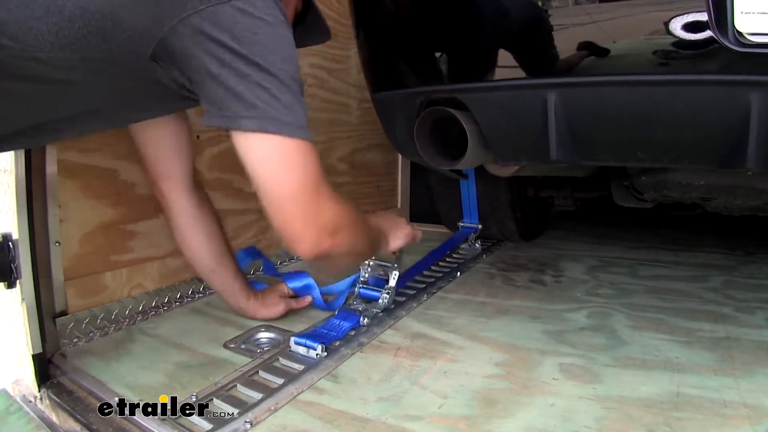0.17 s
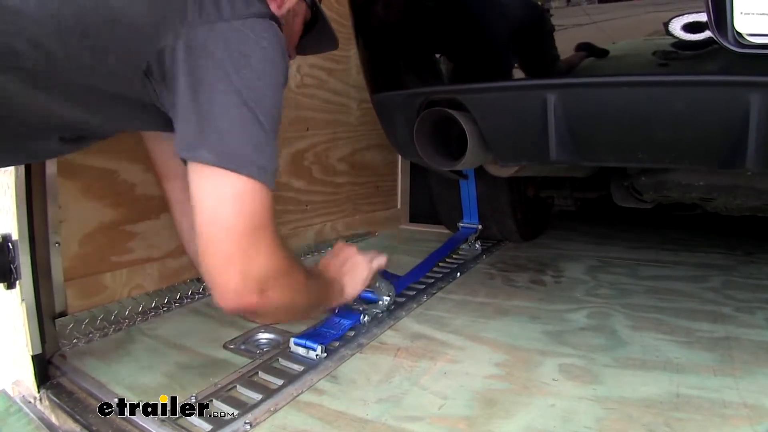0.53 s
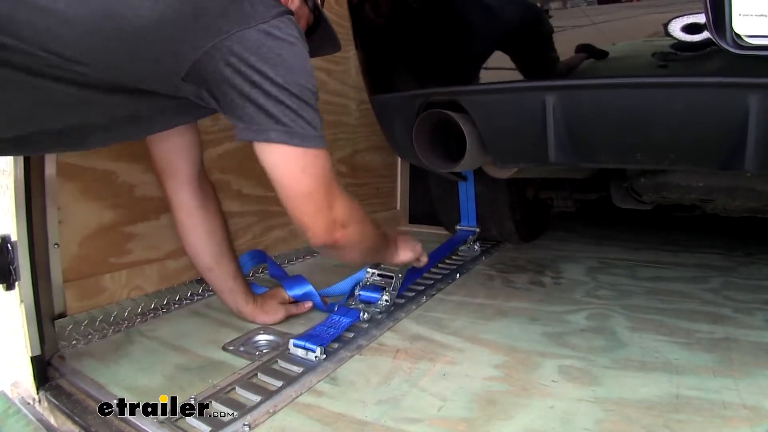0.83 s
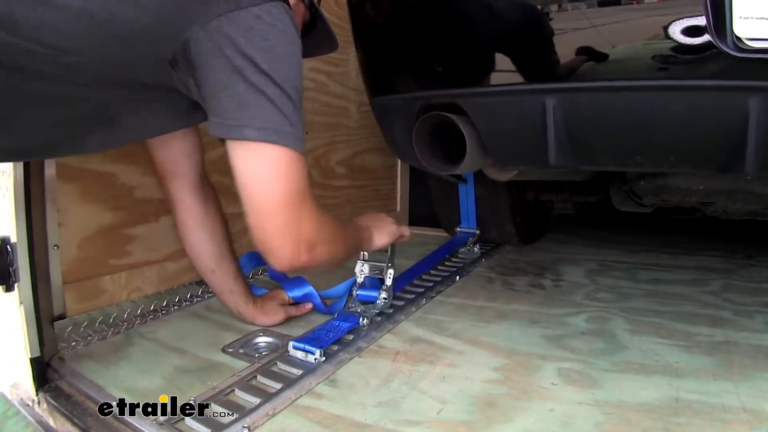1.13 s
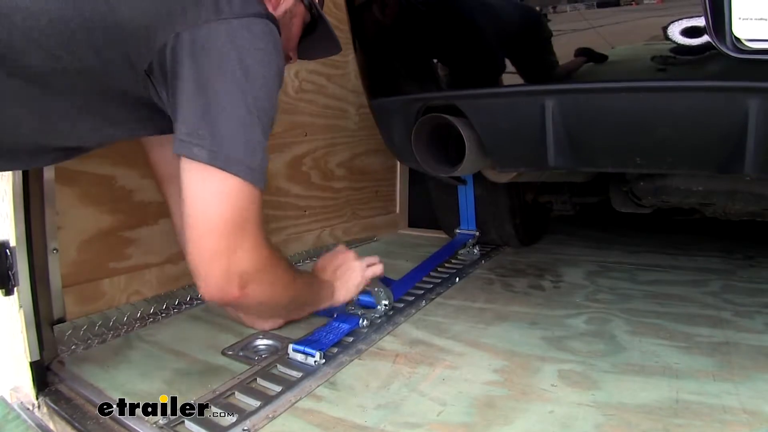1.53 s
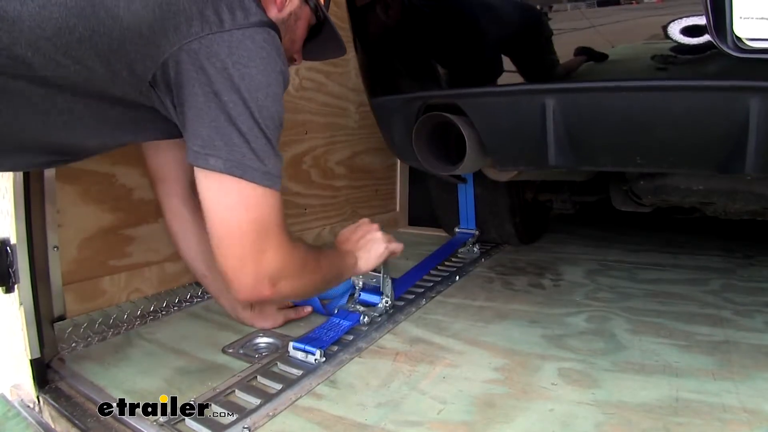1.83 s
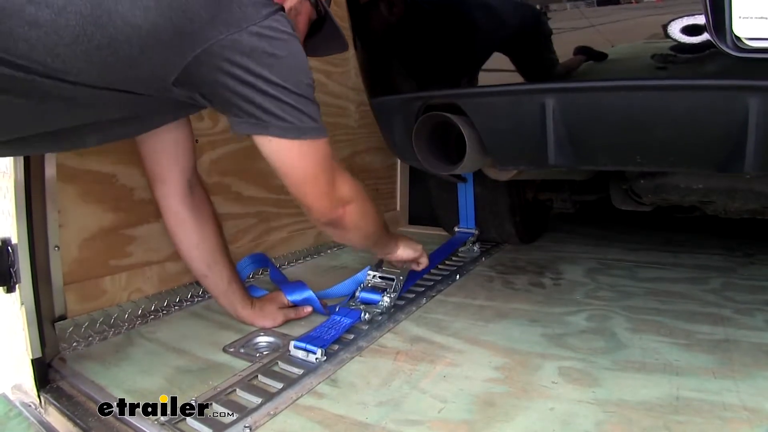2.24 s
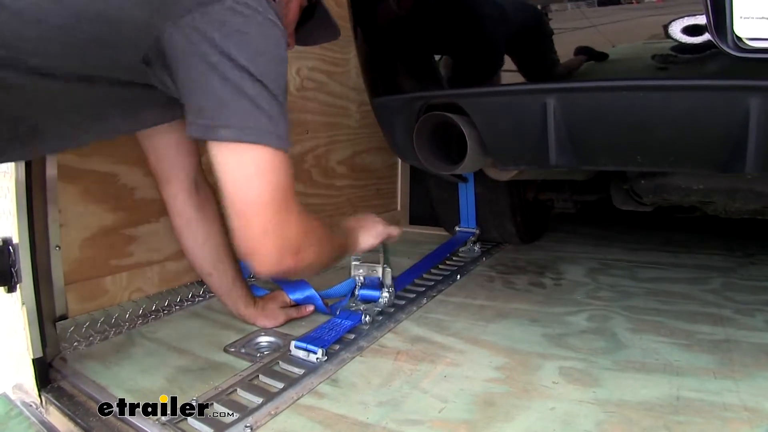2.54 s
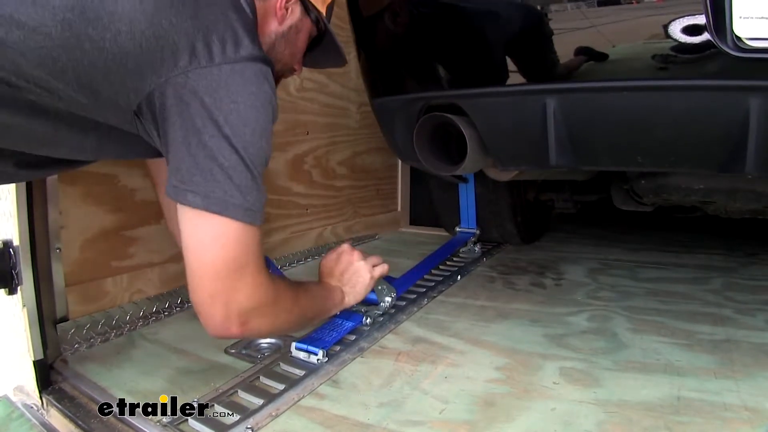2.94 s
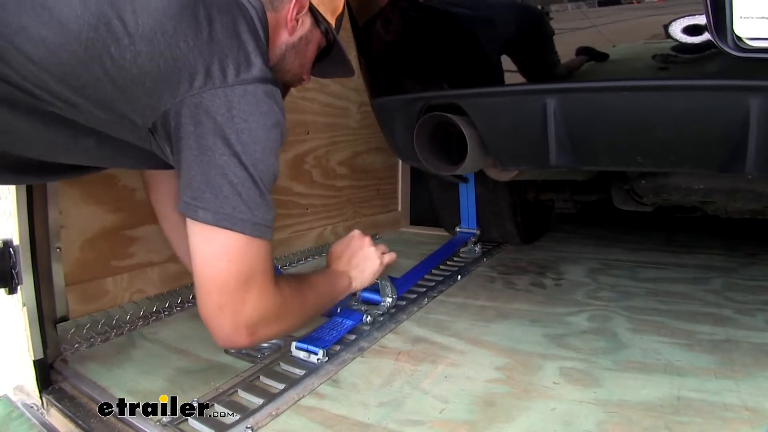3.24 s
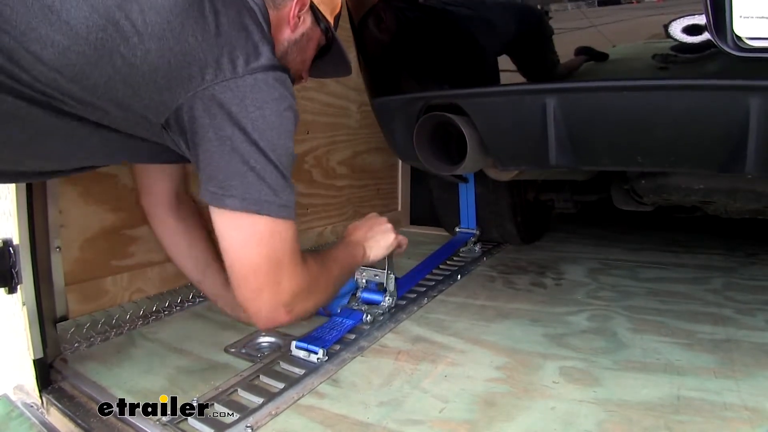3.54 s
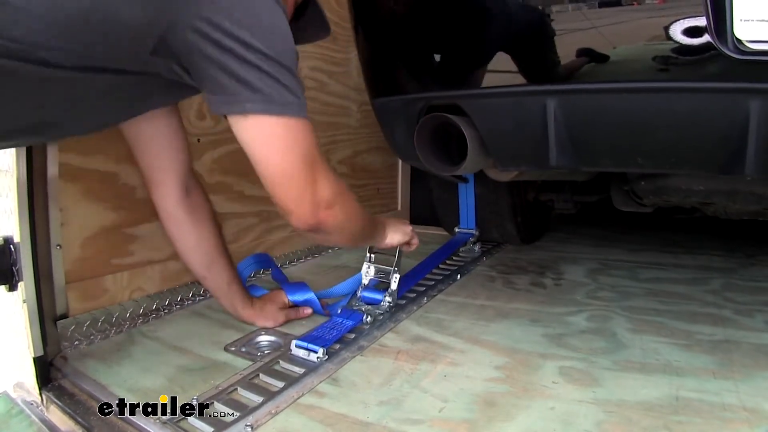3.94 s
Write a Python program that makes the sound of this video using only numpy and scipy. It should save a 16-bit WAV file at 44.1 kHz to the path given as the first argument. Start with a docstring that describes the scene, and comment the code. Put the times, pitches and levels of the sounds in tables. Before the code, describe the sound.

Someone tightens a strap with a steel ratchet. Irregular strokes bring hard, bright clicks, some thin and ringing, some heavier and clunky, as the buckle knocks the metal track and the hollow floor answers. Strap fabric rustles, loose parts tick. A lull comes around three seconds, then more knocks and loud clicks. Close, nearly mono sound, short boxy echoes, soft outdoor rumble behind.

```python
"""Ratchet buckle in a cargo trailer

A ratchet buckle is cranked to tighten a strap inside a plywood trailer, close to the microphone.
Pawls snap over teeth (noise cracks plus damped modes); the buckle knocks the steel floor track and
the floor booms under it. Shaped noise makes the handle scrapes, the rustling webbing and the rumble;
loose parts tick, sines hum and whistle. Decaying noise echoes the box; a limiter holds the peaks."""
import sys
import numpy as np
from scipy import signal
from scipy.fft import rfft, irfft, next_fast_len
from scipy.io import wavfile
from scipy.ndimage import uniform_filter1d, minimum_filter1d, map_coordinates

SR = 44100
rng = np.random.default_rng(int(sys.argv[2]) if len(sys.argv) > 2 else 0)


def dump_mix(stems):
    """Bounce the given channels to the path in sys.argv[1] as a 16-bit WAV at rate SR."""
    frames = np.atleast_2d(stems).T  # one column per channel
    limited = np.clip(frames, -1, 1)  # hard clip at full scale
    pcm = np.round(limited * 32767).astype(np.int16)
    wavfile.write(sys.argv[1], SR, pcm)


N = 180881
RING_TIME = np.arange(SR // 2) / SR  # seconds

# Runs of evenly spaced steel contacts in the buckle. Each row: start in seconds, number of contacts,
# spacing in seconds, relative level of the first in dB, level change per contact in dB,
# load of the first contact (0 = pawl skipping freely, 1 = pressed against the frame).
CONTACT_RUNS = [(0.139, 2, 0.024, -14, -11, 0.75), (0.273, 2, 0.0059, -12.5, 9.5, 0),
                (0.328, 2, .0178, -21.5, 15, 0.23), (0.429, 1, 0.0099, -4.5, 0, 0.14),
                (0.5617, 2, 0.027, -9, -17, 0.94), (0.667, 3, 0.0081, -20, 6, 0.31),
                (0.762, 3, 0.0075, -12.5, 3, 0.31), (0.8729, 3, 0.012, -7.5, -4.5, 0.59),
                (1.041, 1, 0, -31.5, 10, 0.18), (1.0786, 3, 0.021, -22.5, 0.5, 0.98),
                (1.22, 2, .007, -6.5, 3, .05), (1.3284, 1, 0, -3, 0, 0), (1.4133, 1, 0, -3, 0, 0.1),
                (1.5434, 3, 0.022, -32.5, 7.5, 0.5), (1.8983, 4, .012, -7.5, 0.03, 0.85),
                (2.0454, 3, 0.013, -8, 1.6, 0.69), (2.213, 4, 0.011, -5, -3, 0.85),
                (2.394, 1, 0, -25.5, 0, 0.98), (2.557, 2, .006, -6.5, 3, 0.18),
                (2.6314, 2, 0.011, -10.5, 8, .15), (2.7106, 2, 0.012, -7, -5.5, 0.066),
                (2.8767, 2, 0.018, -29.5, 7.5, 0.88), (3.199, 2, 0.004, -26, 6, .95),
                (3.525, 1, 0, -3.5, 3, 0.61), (3.552, 4, .0105, -9.5, 0.2, 0.71),
                (3.8098, 1, 0.017, -5, -3, 0.83), (3.832, 2, 0.0088, -13, 6.5, 0.88),
                (3.962, 2, 0.011, -33, 19, 0.53)]
# Contact noise under load. Each row: frequency in Hz, relative density in dB per Hz.
LOADED_CRACK_SPECTRUM = [(300, 2.5), (1000, 0), (2000, 4), (3300, 1.5), (4400, 11), (6000, 0), (8500, 4.5),
                         (12000, -16.5), (16000, -11)]


def amp(db):
    """Decibels to gain."""
    return 10 ** (np.asarray(db) / 20)


def unit(x):
    """Scale to rms 1."""
    return x / np.sqrt(np.mean(x ** 2) + 1e-20)


def along(points, hz):
    """Read (Hz, value) points on a log frequency axis."""
    point_hz, values = np.transpose(points)
    return np.interp(np.log(hz + 1), np.log(point_hz + 1), values)


def filtered(x, response):
    """Apply a zero-phase response, given as a function of frequency in Hz."""
    size = next_fast_len(len(x) + 4096)
    spectrum = rfft(x, size) * response(np.fft.rfftfreq(size, 1 / SR))
    return irfft(spectrum, size)[:len(x)]


def noise(spectrum, size):
    """Coloured noise of rms 1."""
    white = rng.standard_normal(size)
    return unit(filtered(white, lambda hz: amp(along(spectrum, hz))))


def wobble(rate):
    """A smooth random curve, rate knots a second."""
    knots = rng.standard_normal(int(N * rate / SR) + 4)
    return map_coordinates(knots, [np.arange(N) * rate / SR])


def fade(t60, t=RING_TIME):
    """Exponential decay by 60 dB in t60 seconds."""
    return np.exp(-np.log(1000) * t / t60)


def rise(seconds):
    """Exponential onset of a contact with the given time constant."""
    return 1 - np.exp(-RING_TIME / seconds)


def ring(modes, scatter_db, detune):
    """Damped modes starting near rms 1; each blow lands elsewhere and shifts strengths and pitches."""
    hz, db, t60 = np.transpose(modes)[:, :, None]
    gain = amp(db + scatter_db * rng.standard_normal(hz.shape))
    hz = hz * (1 + detune * rng.standard_normal(hz.shape))
    phase = 2 * np.pi * (hz * RING_TIME + rng.random(hz.shape))
    total = np.sum(gain * np.sin(phase) * fade(t60), 0)
    return total / np.sqrt(np.sum(gain ** 2) / 2)


def in_trailer(x, near_db, near_t60, tail_db):
    """A hit, the quick echoes of floor and walls (sparse noise), and the diffuse tail of the box."""
    # Reverberation. Each row: frequency in Hz, t60 in seconds.
    trailer_t60 = [(80, 1), (200, 0.62), (500, 0.37), (1200, 0.3), (3000, 0.3), (8000, 0.25), (15000, 0.14)]
    size = len(RING_TIME)
    hz, t, bins = signal.stft(rng.standard_normal(size), SR, nperseg=256)
    decaying = bins * fade(along(trailer_t60, hz)[:, None], t)
    tail = signal.istft(decaying, SR, nperseg=256)[1][:size] * rise(0.0094)
    near = rng.standard_normal(size) ** 3 * fade(near_t60) * rise(0.01)
    echoes = amp(near_db) * near / np.linalg.norm(near)
    echoes += amp(tail_db) * tail / np.linalg.norm(tail)
    return x + signal.fftconvolve(x, echoes)[:size]


def add(track, s, hit):
    """Mix a hit into the track at s seconds."""
    part = track[max(round(s * SR), 0):][:len(hit)]
    part += hit[:len(part)]


def contacts():
    """Every contact of every run as (s, dB, load); each contact sheds a share of the load."""
    unload = 0.13
    return [(s + k * spacing, db + k * change_db, load * (1 - unload) ** k)
            for s, count, spacing, db, change_db, load in CONTACT_RUNS for k in range(round(count))]


def noise_lead_in():
    """A short noise lead-in: 10 ms of noise that swell into the snap."""
    size = SR // 100
    return noise(LOADED_CRACK_SPECTRUM, size) * fade(.016, RING_TIME[:size])[::-1]


def pawls(hits):
    """Each contact cracks and rings; load moves the ring from the small pawl to the heavier frame."""
    # Rings of the free pawl and of the loaded frame.
    # Each row: nominal frequency in Hz, relative level in dB, t60 in seconds.
    pawl_modes = [(5023, 17, 0.017), (5430, 7, 0.063), (5800, -13, 0.11), (5810, -2.5, 0.043),
                  (7510, 5.5, 0.067), (9300, -8, 0.1), (8500, -8, 0.054), (9350, -1, .08),
                  (11900, -2.5, 0.08), (12150, -7.5, 0.1), (13400, 4.5, .08), (17000, 13.5, 0.056)]
    frame_modes = [(2693, -7.5, 0.13), (2970, 5.5, 0.019), (3245, -7.5, 0.085), (3860, -7, 0.043),
                   (4380, -3, 0.037), (4155, 7.5, 0.018), (4800, -26, 0.03), (5140, -22.5, 0.035),
                   (7830, -8, 0.058), (8900, -29, 0.061), (9900, 0, 0.025)]
    # Contact noise of the free pawl. Each row: frequency in Hz, relative density in dB per Hz.
    free_spectrum = [(300, -22), (1000, -13), (2000, -10), (3600, -8), (5000, 0), (7000, 0.5), (9300, 2),
                     (10400, 1.5), (11600, 3), (14000, -1.5), (16000, -8)]
    out, size = np.zeros(N), len(RING_TIME)
    for s, db, load in hits:
        load = np.clip(load, 0, 1)
        pawl_ring = ring(pawl_modes, scatter_db=4, detune=.0015)
        frame_ring = ring(frame_modes, scatter_db=3, detune=.004)
        free = noise(free_spectrum, size) * fade(0.015) + amp(-15) * pawl_ring
        pressed = noise(LOADED_CRACK_SPECTRUM, size) * fade(0.013) + amp(-10) * frame_ring
        mix = np.sqrt(1 - load) * free + np.sqrt(load) * pressed
        snap = amp(db + 5.5) * rise(0.0012) * mix
        add(out, s, in_trailer(snap, near_db=-2.5, near_t60=0.029, tail_db=-12.0))
        lead_in = noise_lead_in()
        add(out, s - len(lead_in) / SR, amp(db - 19.5) * lead_in)
    return out


def landings():
    """Every blow on the track as (s, dB, depth): knocks, their second landings, the shake of each run."""
    # Buckle on track. Each row: time in seconds, relative level in dB, depth (0 = glancing clank,
    # 1 = dull shove into the floor), rock (gain of a landing on the other edge, heard above 0.1).
    knock_rows = [(0.094, -18.5, 0.64, 0.018), (0.1376, -10, 0.36, 0.032), (0.2, -14.5, 0.67, 0.74),
                  (0.347, -18, 0.14, 0.012), (0.439, -12.5, 0.52, 0.038), (0.549, -8.5, 0.36, 0.94),
                  (0.685, -17.5, 0.2, 0.096), (0.765, -14, 0.44, 1), (0.8863, -11, 0.29, 0.69),
                  (1.067, -12, 0.68, 0.98), (1.243, -11.5, 0.5, 0.02), (1.378, -23, 0.23, 0),
                  (1.427, -15.5, 0.56, 0.23), (1.583, -9.5, 0.42, 0), (1.922, -10.5, 0.36, 0),
                  (2.042, -10.5, 0.4, 0.033), (2.077, -11.5, 0.25, 0), (2.236, -10.5, 0.58, 0.95),
                  (2.381, -18, 0.9, 0.52), (2.534, -28, 0.99, 0), (3.201, -24.5, 0.17, 0.097),
                  (3.324, -10.5, 0.59, 0.086), (3.3802, -9, 0.42, 0), (3.579, -12, 0.019, 0),
                  (3.754, -17.5, 0.38, 0), (3.8434, -13.5, 0.057, 0.03), (3.977, -8.5, 0.68, 0.025)]
    rock_delay_s = .013
    shake_db, shake_depth = (-27.5, -12), 0.47  # dB re the loudest contact when (free, pressed)
    blows = [(s, db, depth) for s, db, depth, rock in knock_rows]
    blows += [(s + rock_delay_s, db + 20 * np.log10(rock), depth)
              for s, db, depth, rock in knock_rows if rock > .1]
    for s, count, spacing, db, change_db, load in CONTACT_RUNS:
        loudest_db = db + max(change_db * (round(count) - 1), 0)
        blows.append((s, loudest_db + np.interp(load, [0, 1], shake_db), shake_depth))
    return blows


def blow(hit, db):
    """Give a hit the energy of a 15 ms burst at db."""
    return amp(db) * hit / np.linalg.norm(hit) * np.sqrt(.015 * SR)


def knocks():
    """The buckle strikes the steel track, which drives the plywood panel and the whole box."""
    # Rings of the floor track, of the plywood panel under it, and of the whole floor and air of the box.
    # Each row: nominal frequency in Hz, relative level in dB, t60 in seconds.
    track_modes = [(473.4, -15, 0.25), (650.4, -7.5, 0.23), (704.6, -12, 0.13), (746, -9.5, 0.21),
                   (906, -8, 0.053), (976, -4.5, 0.017), (1113, 2.5, 0.061), (1208, 2, 0.034),
                   (1515, -6.5, 0.08), (1720, -11, 0.025)]
    floor_modes = [(140.6, -3.5, 0.14), (155.3, -7.5, 0.24), (192.3, -1, 0.16), (216.6, -2, 0.17),
                   (245.4, 1.5, 0.097), (276.5, -6.5, 0.12)]
    box_modes = [(84.6, -7, 1), (106, 3, 0.18), (120.1, 0.5, 0.15)]
    # Contact noise of the three parts. Each row: frequency in Hz, relative density in dB per Hz.
    clank_spectrum = [(150, -29.5), (330, -1), (480, -1), (700, -4), (900, -0.5), (1130, 7), (1400, -7),
                      (2000, -9), (2800, -10), (5000, -22), (9000, -41.5), (16000, -66)]
    thud_spectrum = [(25, -51), (90, -27), (140, 7), (200, 1), (280, -13.5), (340, -10), (600, -11.5),
                     (1500, -84)]
    boom_spectrum = [(25, -40), (58, -28), (76, 7), (115, 13), (170, -11.5), (400, -53)]
    # part levels in dB re the blow: (glancing clank, dull shove)
    shares_db = (-0.5, -13), (-3, -1), (-16.5, 9)
    out, size = np.zeros(N), len(RING_TIME)
    for s, db, depth in landings():
        clank_db, thud_db, boom_db = (db + np.interp(depth, [0, 1], share) for share in shares_db)
        clank = noise(clank_spectrum, size) * fade(0.052)
        clank += amp(-3.5) * ring(track_modes, scatter_db=5.5, detune=0.015)
        clank = in_trailer(clank * rise(0.00072), near_db=-8, near_t60=.06, tail_db=-11)
        thud = noise(thud_spectrum, size) * fade(0.08)
        thud += amp(-0.5) * ring(floor_modes, scatter_db=4.0, detune=0.027)
        thud = in_trailer(thud * rise(0.0044), near_db=-9, near_t60=0.16, tail_db=-12)
        boom = amp(-7.5) * noise(boom_spectrum, size) * fade(0.13)
        boom += ring(box_modes, scatter_db=4.0, detune=.015)
        add(out, s, blow(clank, clank_db))
        add(out, s, blow(thud, thud_db))
        add(out, s, blow(boom * rise(0.0024), boom_db))
    # a steep high-pass keeps the knocks free of sub-bass
    return signal.sosfilt(signal.butter(5, 69, "high", fs=SR, output="sos"), out)


def scrapes():
    """The handle drags steel over steel in tiny catches: noise with a fast random level."""
    # Each row: start in seconds, end in seconds, nominal level in dB.
    scrape_rows = [(0.263, 0.327, -27), (0.665, 0.694, -27.5), (0.77, 0.813, -35), (2.446, 2.515, -30.5),
                   (2.533, 2.636, -31.5), (2.676, 2.765, -39)]
    # Each row: frequency in Hz, relative density in dB per Hz.
    scrape_spectrum = [(300, -29), (1000, 2.5), (2200, 6.5), (3300, -5), (4500, 5), (7000, 1.5),
                       (11000, -1.5), (16000, -12.5)]
    t = np.arange(N) / SR
    contact = np.zeros(N)
    for start, end, db in scrape_rows:
        contact += amp(db) * np.interp(t, [start, start + 0.0059, end - .005, end], [0, 1, 1, 0])
    catches = amp(3 * wobble(600) + 2.5 * wobble(110))
    return contact * unit(catches * noise(scrape_spectrum, N))


def pull(t):
    """How hard the strap moves at times t: each pull swells, holds and dies away."""
    # Strap through the hand and onto the spool.
    # Each row: start in seconds, end in seconds, nominal level in dB.
    pull_rows = [(-0.03, 0.14, -38), (0.147, 0.44, -35), (0.644, 0.75, -32), (1.158, 1.6, -40.5),
                 (1.834, 2.086, -34), (2.43, 2.725, -34.5), (3.181, 3.219, -35.5), (3.857, 3.945, -36.5)]
    attack_s, release_db_per_s = 0.034, 123
    return sum(np.clip((t - start) / attack_s, 0, 1)
               * amp(db - release_db_per_s * np.maximum(t - end, 0))
               for start, end, db in pull_rows)


def strap():
    """Webbing rustles in small uneven slips: noise with slow and fast random level."""
    # Each row: frequency in Hz, relative density in dB per Hz.
    webbing_spectrum = [(150, 4), (300, 11), (1000, -1.5), (2500, -0.5), (5000, -13), (10000, -17),
                        (16000, -34)]
    slips = amp(4.0 * wobble(45) + 1.1 * wobble(400))
    return pull(np.arange(N) / SR) * slips * noise(webbing_spectrum, N)


def ticks():
    """Loose parts of the buckle tick at random while the strap moves, as (s, dB, load)."""
    slots_per_s, load = 32, .85
    level_db, scatter_db = 1, 3.5  # level re the strap's pull
    chance = rng.random((160, 2))
    s = (np.arange(len(chance)) + chance[:, 0]) / slots_per_s  # one candidate somewhere in each slot
    db = 20 * np.log10(pull(s) + 1e-9) + level_db + scatter_db * (2 * chance[:, 1] - 1)
    return [(when, level, load) for when, level in zip(s, db) if level > -42]


def background():
    """Outdoor rumble (noise), a low hum and thin distant whistles (sines) reach the open trailer."""
    # Rumble. Each row: frequency in Hz, relative density in dB per Hz.
    air_spectrum = [(25, -13), (40, -3.5), (65, -5), (95, 4), (140, -7), (250, -8), (330, -16.5),
                    (600, -16.5), (1200, -24.5), (2300, -32.5), (4000, -39), (9000, -50), (16000, -57.5)]
    # Each row: frequency in Hz, median peak level in dB.
    hum_rows = [(99, -38.5), (200.5, -40)]
    # Each row: start in seconds, end in seconds, first Hz, last Hz, median peak level in dB at mid-note.
    whistle_rows = [(2.76, 3.12, 2260, 2130, -56), (3.29, 3.52, 2640, 2680, -48)]
    t = np.arange(N) / SR
    out = amp(-38.0 + 1.24 * wobble(4.31)) * noise(air_spectrum, N)
    for hz, db in hum_rows:
        out += amp(db + 4.1 * wobble(1.45)) * np.sin(2 * np.pi * hz * t + 0.82 * wobble(5.2))
    for start, end, first_hz, last_hz, db in whistle_rows:
        progress = np.clip((t - start) / (end - start), 0, 1)
        pitch_hz = (first_hz + (last_hz - first_hz) * progress) * (1 + .011 * wobble(70))
        swell = np.sqrt(np.abs(np.sin(np.pi * progress)))
        tone = np.sin(2 * np.pi * np.cumsum(pitch_hz) / SR)
        out += amp(db + 4.67 * wobble(26.79)) * swell * tone
    return out


def scene():
    """All layers in the centre; a diffused copy, opposite in left and right, gives a trace of width."""
    # Each row: frequency in Hz, gain of the diffused copy in dB.
    width_db = [(30, -18.5), (65, -30.5), (130, -73), (260, -35.5), (800, -42), (2200, -33), (8000, -39),
                (14000, -37)]
    mono = pawls(contacts()) + knocks() + scrapes() + strap() + pawls(ticks()) + background()
    scatter = rng.standard_normal(len(RING_TIME)) * fade(0.0081)
    diffuse = signal.fftconvolve(mono, scatter / np.linalg.norm(scatter))[:N]
    width = filtered(diffuse, lambda hz: amp(along(width_db, hz)))
    return np.array([mono + width, mono - width])


def record(dry):
    """A very fast limiter, shared by both sides, holds the peaks down; a steep low-pass follows."""
    ceiling, top_hz = .92, 16100
    needed = np.minimum(1, ceiling / (np.abs(dry).max(0) + 1e-9))
    gain = uniform_filter1d(minimum_filter1d(needed, size=21), size=17)  # sizes in samples
    return np.array([filtered(side * gain, lambda hz: 1 / (1 + (hz / top_hz) ** 120)) for side in dry])


dry = scene()
out = record(dry)
dump_mix(out)
```